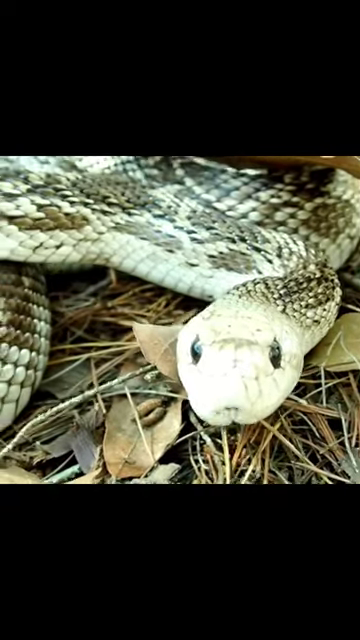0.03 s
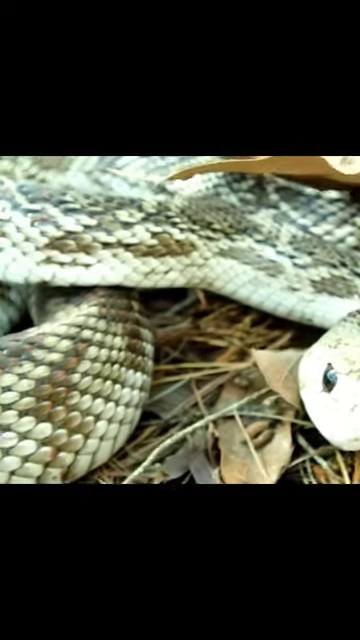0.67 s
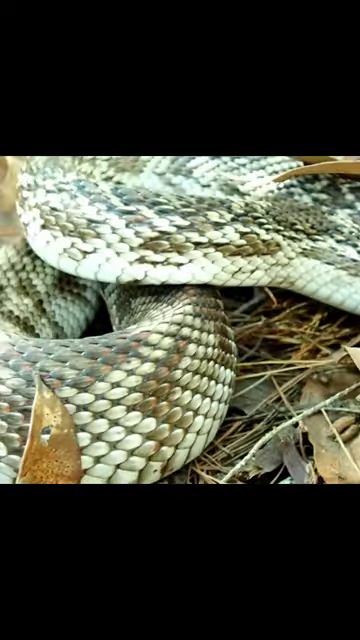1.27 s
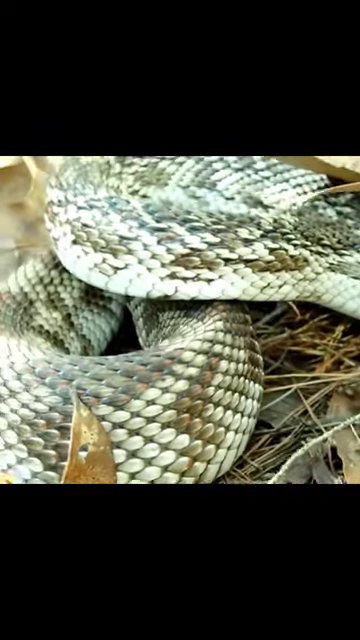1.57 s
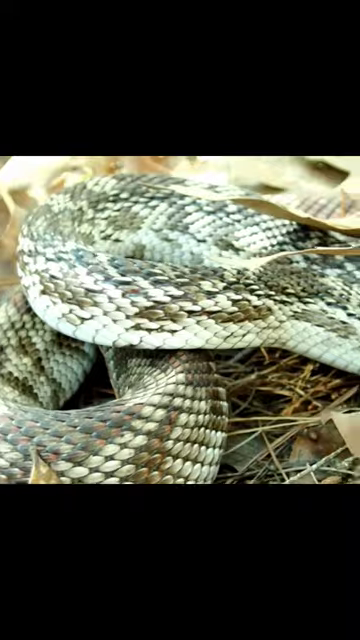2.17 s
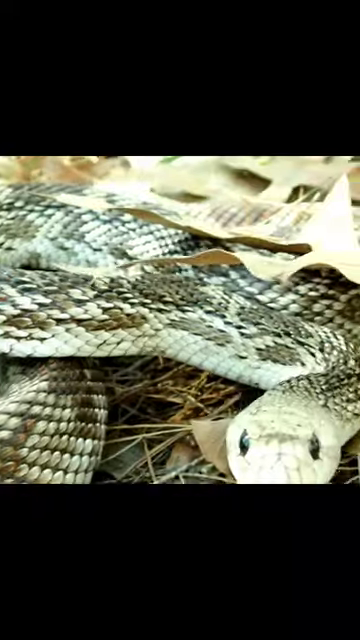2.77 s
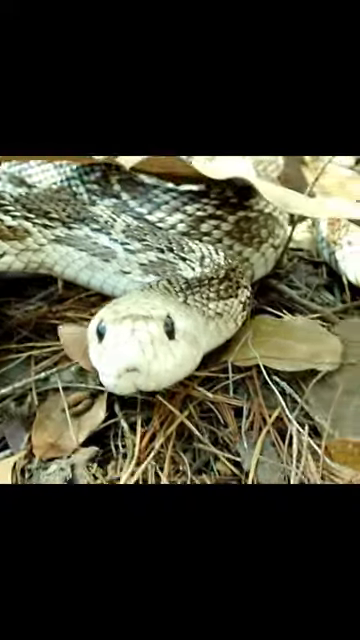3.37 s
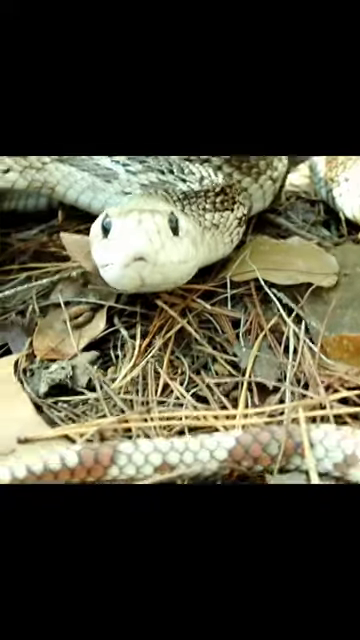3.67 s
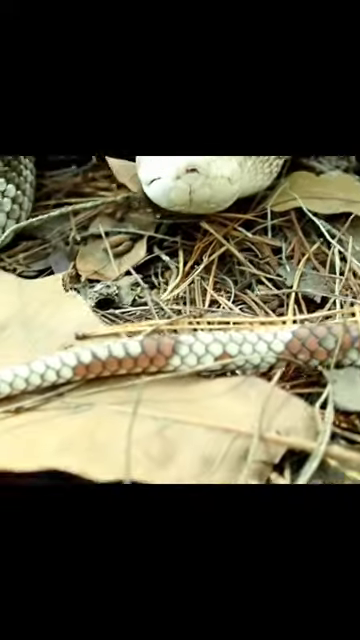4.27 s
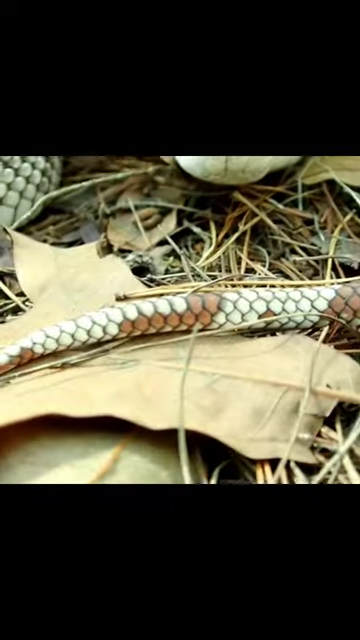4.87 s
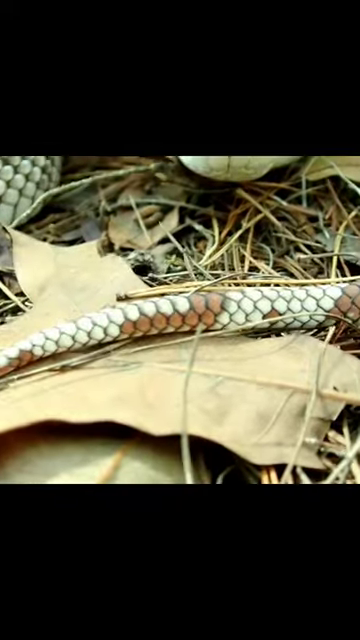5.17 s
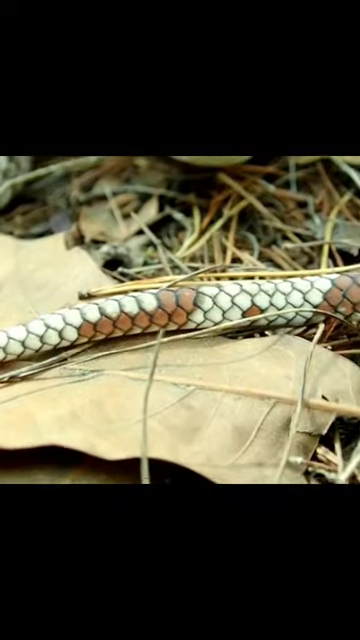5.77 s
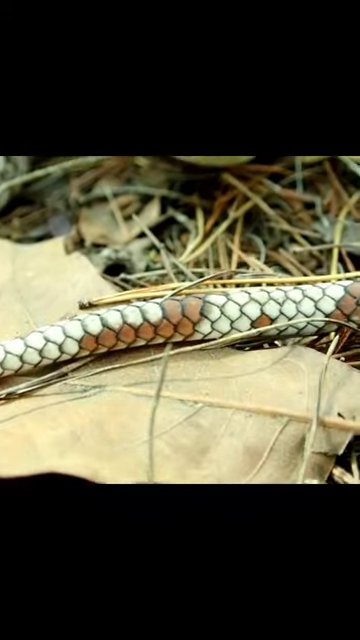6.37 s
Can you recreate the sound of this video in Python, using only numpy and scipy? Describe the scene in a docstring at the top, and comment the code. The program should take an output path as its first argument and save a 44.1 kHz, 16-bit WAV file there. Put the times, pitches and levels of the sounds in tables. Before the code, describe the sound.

A snake's tail beats on dry leaves in a fast, brittle buzz, heard up close: stuttering bursts first, with a very faint whine beneath, then longer rattles and a few final flicks. It grows quiet, leaving a far outdoor rumble, a steady hiss and the faint ticks of a focus motor. Then scales drag softly through the leaves and pine needles, which rustle and snap.

```python
"""A snake buzzes its tail against dry leaves, about 92 strokes a second, in short flicks and longer runs.
Each stroke slaps a leaf, rings it and grazes it on the way back. Then the snake slides off: its scales
drag through the litter, which rustles and snaps, while a camera's focus motor ticks faintly in pairs.
A thin whine sits under the first flicks; a distant outdoor rumble and a high hiss run throughout."""
import sys
import numpy as np
from scipy import signal
from scipy.fft import rfft, irfft, next_fast_len
from scipy.io import wavfile
from scipy.ndimage import map_coordinates

SR = 44100
rng = np.random.default_rng(int(sys.argv[2]) if len(sys.argv) > 2 else 0)


def transcribe(signal):
    """Save signal, clipped to [-1, 1], as a 16-bit WAV file at the path in sys.argv[1]."""
    frames = np.atleast_2d(signal).T
    limited = np.clip(frames, -1, 1)
    pcm = np.round(limited * 32767).astype(np.int16)
    wavfile.write(sys.argv[1], SR, pcm)


N = 283563

# flicks and runs of the tail: start t/s, end t/s, rate/(strokes a second), whip accent/dB
TAIL_BURSTS = [(0.003, 0.063, 94, 0), (0.116, 0.325, 93.4, 8.5), (0.348, 0.424, 86.6, 3.5),
               (0.48, 0.517, 87, 4), (0.547, 0.654, 89, 3.5), (0.710, 0.766, 91.4, 3.5),
               (0.822, 0.864, 105, 8.5), (0.932, 0.957, 102, 3), (1.031, 1.078, 100, 6),
               (1.171, 1.205, 86, 5), (1.262, 1.331, 89, 3), (1.339, 1.815, 101, 1),
               (1.836, 2.494, 95.7, 2.5), (2.552, 2.591, 104, 3.5), (2.670, 2.714, 92, 2),
               (2.760, 3.137, 96.6, 1.5), (3.177, 3.22, 79, 5), (3.264, 3.309, 73.4, 5),
               (3.374, 3.417, 106, 4), (3.467, 3.485, 82, 5.5), (3.599, 3.617, 95, 5.5)]
# how hard the tail works: t/s, relative level/dB, pressure on the leaf/(0-1)
TAIL_EFFORT = [(0, -37, 0.12), (0.5, -36.5, 0.25), (1.28, -36.5, 0.56), (1.38, -35.5, 0.72),
               (2.4, -35.5, 0.86), (2.75, -35.5, 0.02), (3.6, -35.5, 0)]
# broad tone of the beaten leaf: f/Hz, level/dB
LEAF_EQ = [(80, -27), (250, -9), (370, -3), (600, -8), (780, -2.5), (1350, -2), (1800, -11.3), (2700, -8),
           (5000, -11), (6300, -17), (8300, -9), (9400, -23.5), (14500, -24)]
# the leaf's resonances: f/Hz, width/Hz, level/dB
LEAF_RESONANCES = [(870, 130, 3.5), (1080, 110, 2), (2190, 160, 3.5), (2760, 160, 2.5), (3120, 420, 3.3),
                   (4330, 290, 6.8), (5610, 590, 4.5), (7005, 510, 5.6)]
# tone change under a pressing tail: f/Hz, level/dB
PRESSED_EQ = [(400, -4.5), (1000, -0.5), (1800, -0.5), (4500, 0.5), (5400, 4), (7600, 6.5), (8600, -11),
              (14000, -3.5)]
# a graze, thinner than a slap: f/Hz, level/dB
GRAZE_EQ = [(700, -3.5), (2000, -0.5), (4500, 2.5), (8500, 1.5)]
# the leaf's brittle edge: f/Hz, level/dB
CRACK_EQ = [(2000, -29), (6000, -6), (9000, -1), (14000, -1)]
# tone change for hits near the rim: f/Hz, level/dB
RIM_EQ = [(350, -2), (560, 1.5), (720, 2.5), (950, -1.5), (2300, -0.5), (3200, 2.5), (4500, 0)]
# how much of the beating lands on the rim: t/s, share/(0-1)
RIM_SHARE = [(0, 1), (1.0, 0.51), (1.35, 0.2)]
# stereo balance of the tail: f/Hz, left minus right level/dB
TAIL_BALANCE = [(300, -3.5), (2200, -2), (4300, -4), (5000, -6.5), (6200, -2), (7800, -3), (9000, 0)]
# tail sound scattered to the sides: f/Hz, level/dB
SCATTER_SIDE_EQ = [(300, -27), (1200, -40), (3500, -34), (6000, -20), (9000, -10), (14000, -0.5)]
# the body shoves through the litter: centre t/s, length/s, relative level/dB
BODY_SHOVES = [(3.541, 0.1, -55), (5.56, 0.2, -54.5), (5.9, 0.17, -47), (6.159, 0.16, -49.5),
               (6.357, 0.15, -63)]
# litter rustle, mid and side: f/Hz, level/dB
LITTER_MID_EQ = [(180, -31), (300, -3.5), (348, -3), (500, -5.5), (794, 0.5), (1140, -1.5), (1260, -6.5),
                 (2210, -12), (3340, -6.5), (5950, -6), (6680, -15.5), (8010, -4), (9450, -27),
                 (11300, -18), (15500, -27)]
LITTER_SIDE_EQ = [(180, -36), (300, -6), (348, -11), (526, -19), (985, -11), (2360, -22), (3020, -13),
                  (3870, -12), (4280, -2), (5390, -2), (8010, -4), (9450, -26), (15500, -25)]
# needles and leaf edges snapping: t/s, relative level/dB, f/Hz, spread/octaves
NEEDLE_SNAPS = [(4.087, -36, 2000, 0.9), (4.202, -35, 5300, .15), (5.477, -33, 4800, 0.84),
                (5.567, -33, 5000, 0.92), (5.740, -31.5, 3500, 0.28), (5.830, -32, 1000, 0.9),
                (5.951, -35, 4500, 1.1), (6.104, -31.5, 6000, 0.64), (6.196, -29, 4500, 0.67),
                (6.203, -25, 4470, 0.7), (6.229, -29.5, 10000, 0.57), (6.399, -33, 3600, 0.45)]
# fader of the focus motor: t/s, level/dB
MOTOR_FADER = [(3.7, -88), (4.05, -83), (4.15, -68), (4.7, -66), (5.1, -68.5), (6.43, -61)]
# distant rumble, mid and side: f/Hz, level/dB
RUMBLE_MID_EQ = [(18, -54), (28, -17), (48, -5.5), (80, 0), (120, -5), (200, -15), (400, -20), (700, -24),
                 (1300, -28.5), (2400, -38.5), (5000, -68)]
RUMBLE_SIDE_EQ = [(18, -44), (30, -24), (60, -6), (110, -5), (200, -5.5), (450, -10), (1000, -15),
                  (2500, -27.5), (5000, -45)]
# high hiss, mid and side: f/Hz, level/dB
HISS_MID_EQ = [(1200, -13), (2300, -9), (3200, -6), (4000, -9), (5300, -3.5), (6600, -4), (7600, 2.5),
               (8400, -0.5), (9300, -6), (15500, -6.5)]
HISS_SIDE_EQ = [(1200, -20), (3000, -9), (4300, -8), (5000, -2.5), (6500, -2), (7800, 3.5), (9300, -5.5),
                (15500, -6.5)]


def tail():
    """The strokes ring the leaf; the litter around it scatters a short, wide wash."""
    free, pressed, grazes, pushes, cracks = strokes()
    blows = free + eq(pressed, PRESSED_EQ) + eq(grazes, GRAZE_EQ) + eq(cracks, CRACK_EQ)
    blows += coloured(pushes, lambda hz: -9 - 30 * (1 - bell(hz, 1150, 2000)))  # the whole blade flexes
    rim = curve(RIM_SHARE)
    blows = (1 - rim) * blows + eq(rim * blows, RIM_EQ)
    ring_db = lambda hz: sum(db * bell(hz, centre, width) for centre, width, db in LEAF_RESONANCES)
    direct = amp(8) * coloured(blows, lambda hz: along(LEAF_EQ, hz) + ring_db(hz))
    t = np.arange(SR // 5) / SR
    reverb_s = np.array([[.14], [.05]])  # mid, side
    scatter = rng.standard_normal((2, len(t))) * amp(-60 * t / reverb_s)
    scatter /= np.linalg.norm(scatter, axis=1, keepdims=True)
    late, wide = signal.fftconvolve(direct[None], scatter, axes=1)[:, :N]
    mid = direct + amp(-13) * late
    side = eq(wide, SCATTER_SIDE_EQ)
    left = coloured(mid + side, lambda hz: along(TAIL_BALANCE, hz) / 2)
    right = coloured(mid - side, lambda hz: -along(TAIL_BALANCE, hz) / 2)
    return np.array([left, right])


def strokes(rise_s=.0019, graze_db=-7, crack_db=-11.5):
    """Each swing slaps, flexes and cracks the leaf, then grazes it on the way back: five raw stems."""
    free, pressed, grazes, pushes, cracks = np.zeros((5, N))
    times, levels, pressures = np.transpose(TAIL_EFFORT)
    for s, count, rate, accent_db in list(swings()):
        pressure = np.interp(s, times, pressures)
        graze_luck, timing_luck, crack_luck = rng.standard_normal(3)
        force = amp(np.interp(s, times, levels) + accent_db) * np.sqrt(SR / rate)
        attack_s = rise_s * (3 if count == 0 else 2)  # the first swing brushes in more slowly
        slap = force * contact(decay_s=.0048, click=.26, attack_s=attack_s, grain_db=4)
        add(free, s - attack_s, (1 - pressure) * slap)
        add(pressed, s - attack_s, pressure * slap)
        add(pushes, s, np.array([force]))
        tick = force * contact(decay_s=.0009, click=.3, attack_s=.0005, grain_db=3)
        # pressure makes the grazes softer and more even
        graze_gain = amp(graze_db - 1.5 * pressure + (3.5 - 1.71 * pressure) * graze_luck)
        add(grazes, s + (.46 + .12 * timing_luck) / rate, graze_gain * tick)
        crack_gain = amp(crack_db + .9 * accent_db + 6 * crack_luck)
        add(cracks, s + rise_s, crack_gain * tick)
    return free, pressed, grazes, pushes, cracks


def swings(tiring_per_s=.07, jitter=.05, scatter_db=1.05, wind_up_db=-.5, settle_db=-11, fade_db=6):
    """The tail winds up, whips on its second swing, tires and coasts: yields t/s, count, rate, level/dB."""
    for start, end, start_rate, whip_db in TAIL_BURSTS:
        s, coasting = start, 0
        for count, (timing_luck, level_luck) in enumerate(rng.standard_normal((80, 2))):
            rate = start_rate * (1 - tiring_per_s * (s - start))
            coasting += s > end - .3 / start_rate  # swings since the drive stopped
            if coasting > 4:
                break
            accent_db = wind_up_db * (count == 0) + whip_db * (count == 1) + scatter_db * level_luck
            if coasting:
                accent_db += settle_db - fade_db * (coasting - 1)
            slip_s = jitter * timing_luck * np.tanh(count / 4) / rate
            yield s + slip_s, count, rate, accent_db
            s += 1 / rate


def contact(decay_s, click, attack_s, grain_db):
    """One touch on a dry leaf, of energy 1: a swell of tiny cracks with a sharp click at its crest."""
    t = np.arange(SR // 40) / SR
    swell = np.minimum(t / attack_s, 1) ** 2 * np.exp(-np.maximum(t - attack_s, 0) / decay_s)
    crumble = rng.standard_normal(len(t)) * amp(grain_db * rng.standard_normal(len(t))) * swell
    crumble /= np.linalg.norm(crumble)
    crumble[round(attack_s * SR)] += click
    return crumble / np.linalg.norm(crumble)


def slide(grain_db=5, clump_db=2):
    """Scales drag over needles and leaves: clumps of tiny cracks that swell with each shove."""
    grains = amp(grain_db * wobble(1800) + clump_db * wobble(130))
    t = np.arange(N) / SR
    shoving = sum(amp(db) * bell(t, s, length / 2) for s, length, db in BODY_SHOVES)
    crawling = amp(-56) * ramp(start_s=5.4, length_s=.048)
    return (crawling + shoving) * spread(grains, LITTER_MID_EQ, LITTER_SIDE_EQ, side_db=2.5, pan_db=-1)


def snaps(decay_s=.0034):
    """Single needles and leaf edges give way, each a spit of noise at its own pitch."""
    stereo = np.zeros((2, N))
    t = np.arange(SR // 25) / SR
    octave = np.log2(np.fft.rfftfreq(len(t), 1 / SR) + 1)
    for s, db, hz, octaves in NEEDLE_SNAPS:
        band = bell(octave, np.log2(hz), 2 * octaves)
        for channel in stereo:
            noise = irfft(rfft(rng.standard_normal(len(t))) * band, len(t))
            add(channel, s, amp(db - 7.5) * unit(noise) * np.exp(-t / decay_s))
    return stereo


def focus_motor(pairs_per_s=15, sync_s=4.125, gap_cycles=.33, width_cycles=.17):
    """The lens steps in pairs of short whirs that ring its housing."""
    cycles = (np.arange(N) / SR - sync_s) * pairs_per_s
    steps = sum(bell((cycles - lag + .5) % 1, .557, width_cycles) for lag in (0, gap_cycles))
    housing_db = lambda hz: -40 + 40 * bell(hz, 3270, 1310)
    whir = unit(coloured(steps * rng.standard_normal(N), housing_db))
    return whir * amp(curve(MOTOR_FADER))


def whine(hz=3450, waver_hz=45):
    """A thin tone wavers and flickers under the first flicks, then fades out."""
    phase = 2 * np.pi * np.cumsum(hz + waver_hz * wobble(150)) / SR
    flicker = amp(5 * wobble(25))
    fade = 1 - ramp(start_s=1.25, length_s=.25)
    return amp(-72.5) * flicker * fade * unit(np.sin(phase))


def outdoors():
    """The bed: a far, gently heaving rumble and a steady high hiss."""
    heave = amp(1.13 * wobble(9))
    rumble = amp(-46.5) * spread(heave, RUMBLE_MID_EQ, RUMBLE_SIDE_EQ, side_db=-8, pan_db=-3)
    hiss = amp(-54.5) * spread(1, HISS_MID_EQ, HISS_SIDE_EQ, side_db=-.5, pan_db=-1.3)
    return rumble + hiss


def spread(texture, mid_eq, side_eq, side_db, pan_db):
    """Stereo noise under one envelope, mid and side each with its own EQ; negative pan leans right."""
    mid = unit(eq(texture * rng.standard_normal(N), mid_eq))
    side = amp(side_db) * unit(eq(texture * rng.standard_normal(N), side_eq))
    return np.array([mid + side, mid - side]) * amp([[pan_db / 2], [-pan_db / 2]])


def eq(x, points):
    """Shape x with an EQ curve of f/Hz, level/dB points."""
    return coloured(x, lambda hz: along(points, hz))


def coloured(x, gain_db):
    """Run x through the minimum-phase filter whose gain is gain_db(hz)."""
    size = 2 * next_fast_len(N // 2 + SR // 8)
    gain = amp(gain_db(np.fft.rfftfreq(size, 1 / SR)))
    cepstrum = irfft(np.log(gain + 1e-6))
    cepstrum[1:size // 2] *= 2  # folded forward, so ringing follows the hit
    cepstrum[size // 2 + 1:] = 0
    return irfft(rfft(x, size) * np.exp(rfft(cepstrum)), size)[..., :N]


def along(points, hz):
    """Read f/Hz, level/dB points on a log frequency axis."""
    freqs, levels = np.transpose(points)
    return np.interp(np.log(hz + 1), np.log(freqs + 1), levels)


def curve(rows):
    """Automation lane: t/s, value rows to one value per sample."""
    return np.interp(np.arange(N) / SR, *np.transpose(rows))


def ramp(start_s, length_s):
    """A linear fade from 0 to 1."""
    return np.clip((np.arange(N) / SR - start_s) / length_s, 0, 1)


def wobble(rate):
    """Smooth random modulation, rate knots a second."""
    knots = rng.standard_normal(int(N * rate / SR) + 4)
    return map_coordinates(knots, [np.arange(N) * rate / SR])


def bell(x, centre, width):
    """A rounded peak of height 1."""
    return np.exp(-2 * ((x - centre) / width) ** 2)


def amp(db):
    """Decibels to gain."""
    return 10 ** (np.asarray(db) / 20)


def unit(x):
    """Scale to rms 1."""
    return x / np.sqrt(np.mean(x ** 2) + 1e-20)


def add(track, s, sound):
    """Mix a sound in at time s."""
    part = track[max(0, round(s * SR)):][:len(sound)]
    part += sound[:len(part)]


def scene():
    """The snake up front; lens, whine and outdoor bed behind."""
    return tail() + slide() + snaps() + focus_motor() + whine() + outdoors()


def record(dry):
    """A brick-wall high cut on the whole mix."""
    top_hz = 15550
    size = next_fast_len(N + SR // 2)
    passband = np.fft.rfftfreq(size, 1 / SR) < top_hz
    return irfft(rfft(dry, size) * passband, size)[..., :N]


dry = scene()
out = record(dry)
transcribe(out)
```